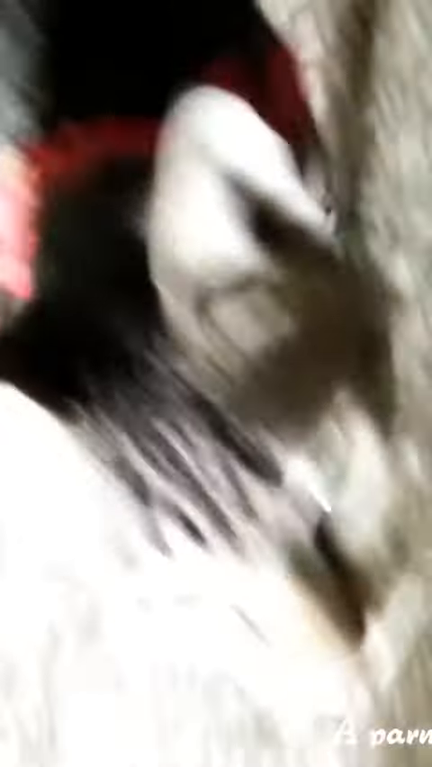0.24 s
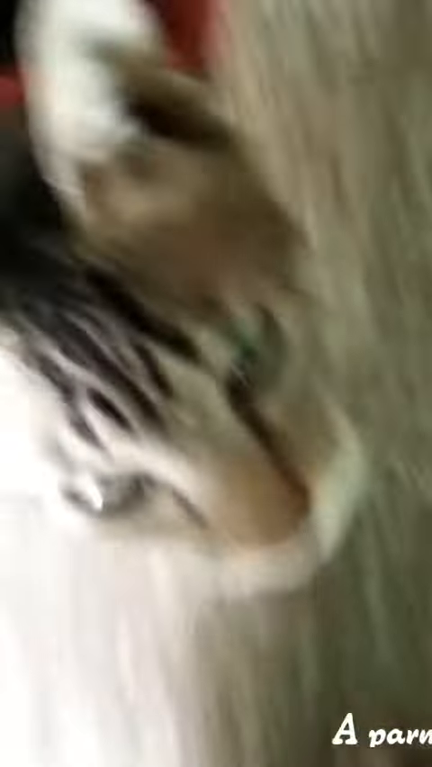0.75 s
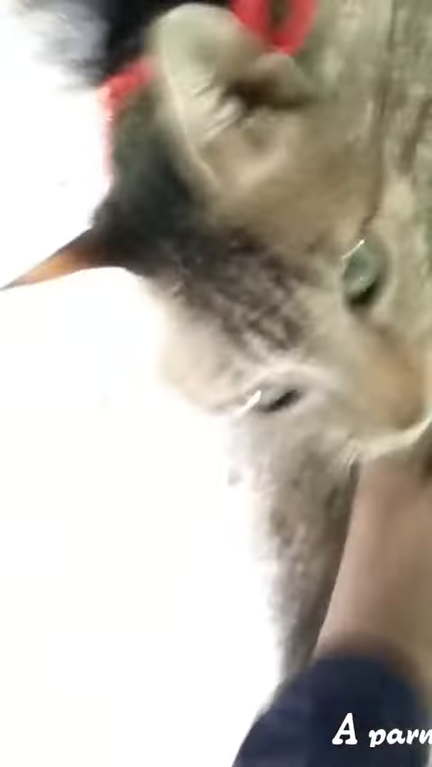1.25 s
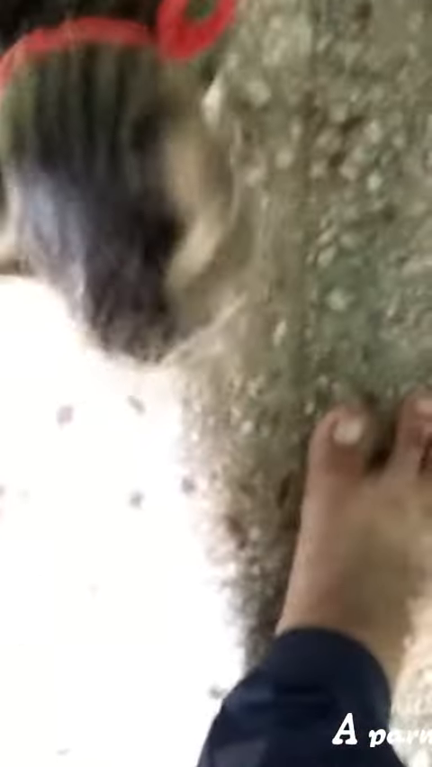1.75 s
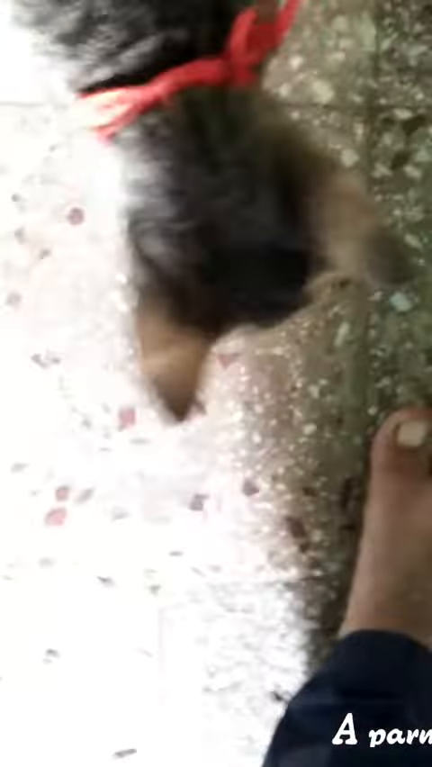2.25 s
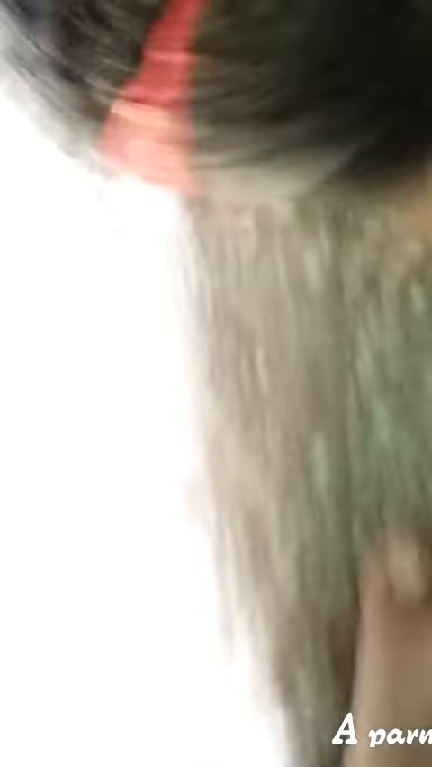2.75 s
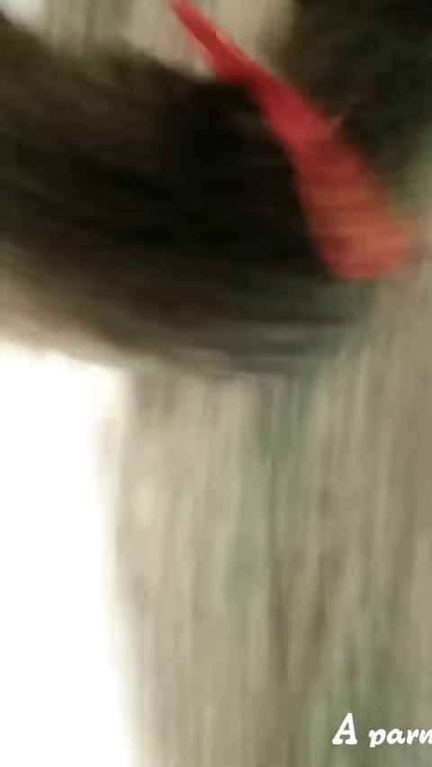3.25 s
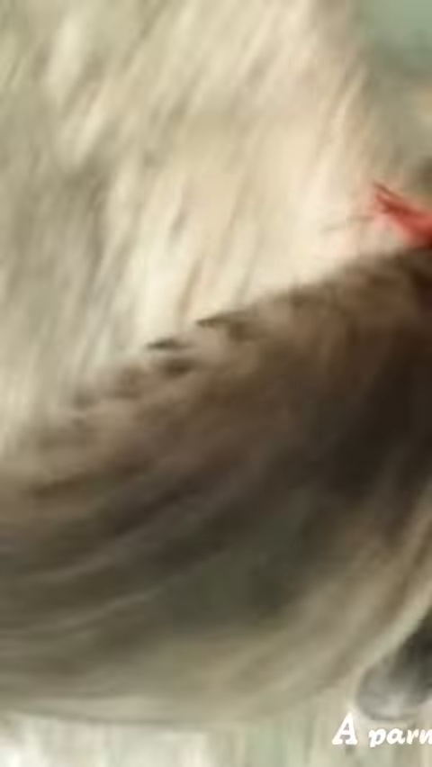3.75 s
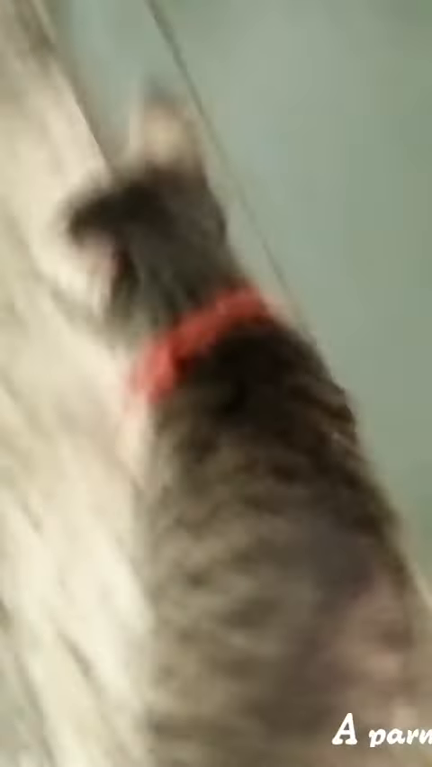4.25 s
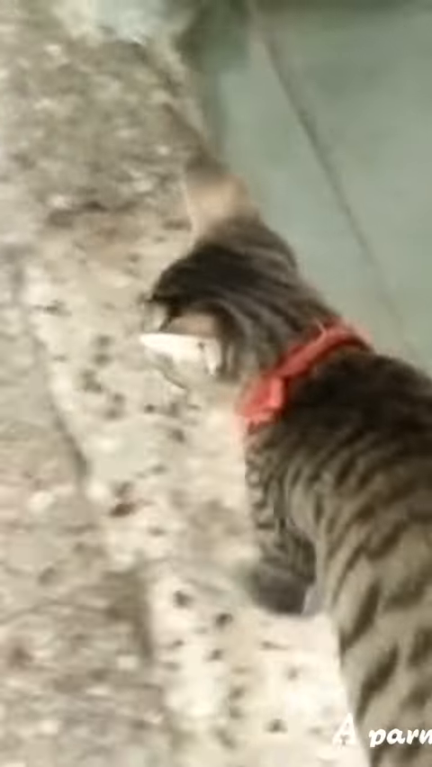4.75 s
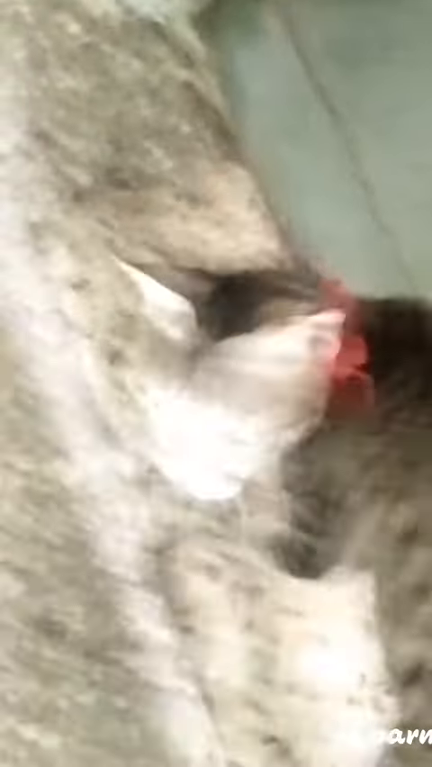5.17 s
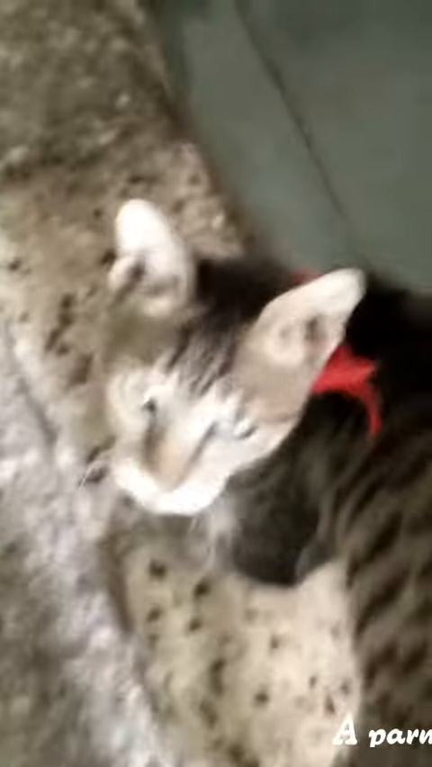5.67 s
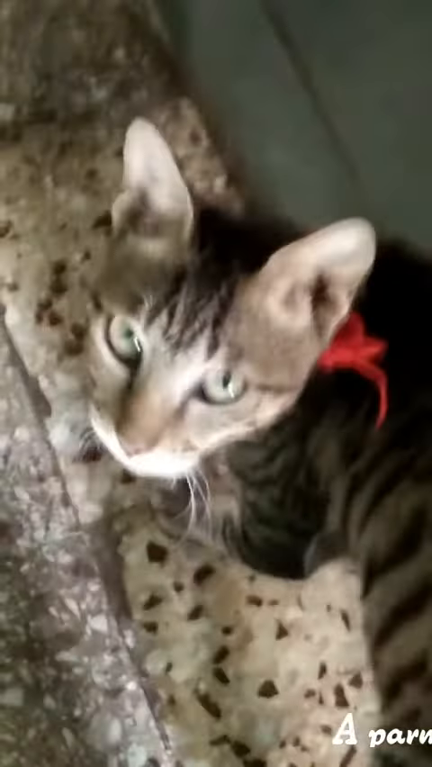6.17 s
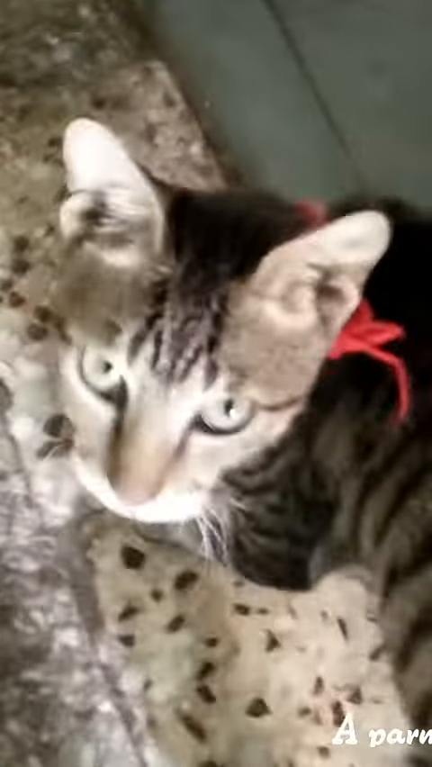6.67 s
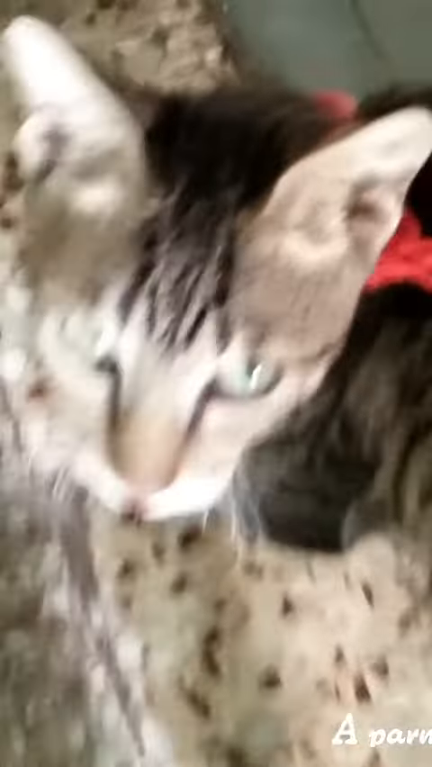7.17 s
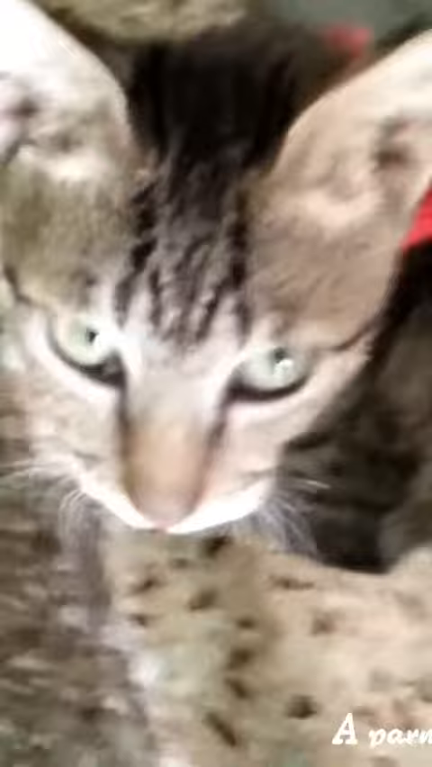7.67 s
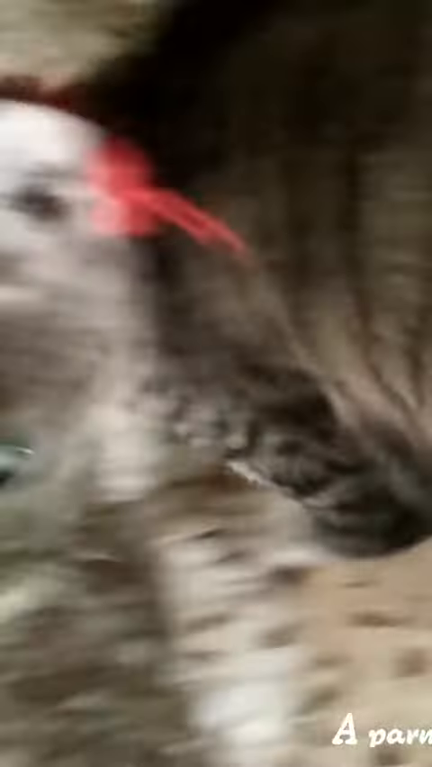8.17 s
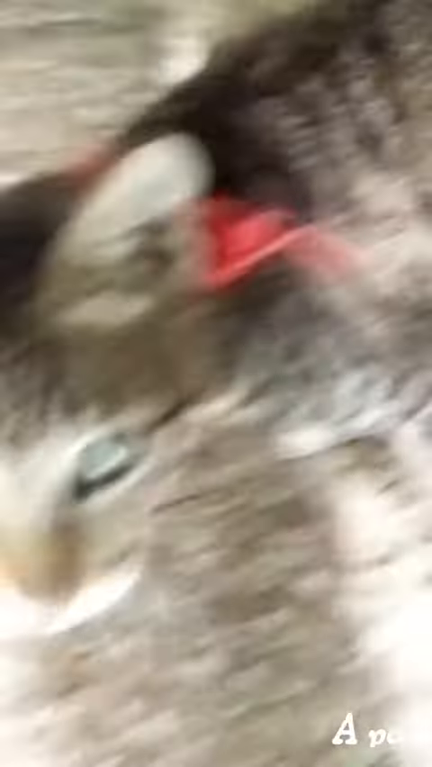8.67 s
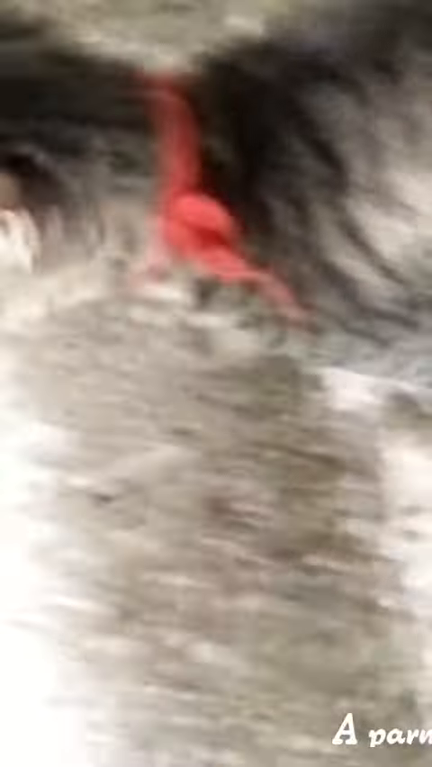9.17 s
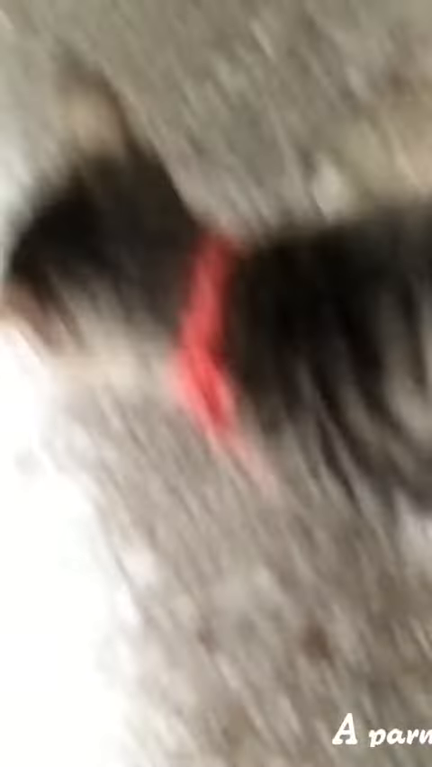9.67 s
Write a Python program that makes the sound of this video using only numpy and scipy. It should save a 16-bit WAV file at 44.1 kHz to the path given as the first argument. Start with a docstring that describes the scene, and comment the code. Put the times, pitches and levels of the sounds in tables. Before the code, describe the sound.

Irregular low thumps, clicks and brief rubbing from a phone being jostled in the hand, over faint rumble and hiss.

```python
"""Close above a kitten, on a carried phone: only the handling is heard. Jostling pushes air in and
out of the microphone port in sudden steps, and the phone's low cut turns each into a falling thump.
The case clicks and is rubbed, and swaying air rumbles underneath. The hiss follows the level,
and the quietest sound crackles on coarse amplitude steps."""
import sys
import numpy as np
from scipy import signal
from scipy.io import wavfile
from scipy.ndimage import uniform_filter1d

SR = 44100
rng = np.random.default_rng(int(sys.argv[2]) if len(sys.argv) > 2 else 0)


def master(y):
    """Save y as 16-bit WAV."""
    cut = np.clip(np.atleast_2d(y).T, -1, 1)
    pcm = np.round(cut * 32767)  # scale
    wavfile.write(sys.argv[1], SR, pcm.astype(np.int16))


N = 437913

# The thumps, as pressure steps at the port: start_s, level_db, direction (+1 or -1), rise_ms
PRESSURE_STEPS = [(0.0122, -13, 1, 1.7), (0.0202, -12.5, 1, 0.28), (0.0508, -8.5, -1, 0.2),
                  (0.0723, -6.5, 1, 3.4), (0.0822, -9.5, 1, 0.35), (0.089, -13, -1, 0.47),
                  (0.102, -25.5, 1, 0.24), (0.1573, -8.5, 1, 5.6), (0.1666, -15, 1, 0.27),
                  (0.1724, -13.5, -1, 0.17), (0.2705, -22.5, 1, 0.32), (0.3421, -26.5, -1, 0.4),
                  (0.4066, -18, 1, 0.4), (0.5455, -24, 1, 1.64), (0.598, -19, -1, 1.45),
                  (0.6999, -17, -1, 0.2), (0.8137, -22, -1, 0.48), (0.8271, -25, -1, 0.51),
                  (0.8912, -24.5, -1, 0.45), (0.9242, -6.5, 1, 1.53), (0.9461, -14, -1, 0.48),
                  (1.0042, -24.5, 1, 0.68), (1.097, -13, 1, 0.36), (1.1312, -17.5, 1, 1.84),
                  (1.1768, -28, -1, 0.36), (1.2776, -6, -1, 1.73), (1.3344, -18.5, 1, 0.26),
                  (1.352, -7, -1, 1.44), (1.3617, -10, -1, 0.4), (1.4545, -19, 1, 0.3),
                  (1.5261, -10.5, 1, 0.26), (1.539, -11.5, 1, 0.33), (1.559, -14, -1, 0.5),
                  (1.666, -4, -1, 0.18), (1.6772, -8, -1, 2.4), (1.7307, -22.5, -1, 0.05),
                  (1.9443, -3.5, 1, 0.12), (1.9841, -33.5, 1, 0.17), (2.0311, -19, 1, 0.31),
                  (2.1078, -23.5, 1, 1.64), (2.3471, -25, -1, 1.65), (2.4903, -33.5, -1, 0.46),
                  (2.5856, -8.5, 1, 0.24), (2.7108, -16.5, -1, 1.4), (2.7446, -12, -1, 0.58),
                  (2.7584, -4, -1, 0.19), (2.7764, -15, -1, 0.72), (2.7801, -8.5, -1, 0.76),
                  (2.7926, -10, -1, 0.28), (2.831, -9, -1, 0.25), (2.9144, -8, 1, 0.2),
                  (2.9706, -11.5, 1, 0.23), (3.1494, -26, -1, 0.12), (3.193, -28.5, 1, 0.57),
                  (3.2816, -8.5, -1, 0.24), (3.2859, -5, -1, 0.44), (3.291, -16.5, -1, 0.25),
                  (3.3276, -24.5, -1, 0.26), (3.3777, -9.5, -1, 0.21), (3.5155, -9.5, -1, 0.27),
                  (3.5215, -18, -1, 0.32), (3.6081, -17.5, 1, 0.66), (3.666, -23.5, 1, 0.48),
                  (3.6848, -5.5, -1, 0.2), (3.698, -3.5, 1, 2.35), (3.718, -11.5, -1, 0.33),
                  (3.7312, -8.5, -1, 0.44), (3.7501, -7.5, -1, 0.33), (3.7974, -8, -1, 0.24),
                  (3.8123, -9, -1, 0.38), (3.8324, -14.5, -1, 1.1), (3.8447, -30, -1, 0.19),
                  (3.9175, -12.5, -1, 0.16), (3.9335, -22.5, 1, 0.43), (4.0115, -36, 1, 0.096),
                  (4.097, -13.5, 1, 1.86), (4.155, 5.5, -1, 2.67), (4.1694, -0.2, -1, 0.12),
                  (4.2289, -3.5, -1, 0.16), (4.2619, -16.5, -1, 0.25), (4.372, -25, 1, 0.28),
                  (4.535, -22.5, -1, 1.86), (4.5938, -22.5, 1, 1.76), (4.795, -20.5, -1, 0.44),
                  (4.8637, -24, 1, 0.68), (4.8955, -22.5, -1, 0.45), (5.0776, -18.5, -1, 0.9),
                  (5.1192, -25, -1, 0.61), (5.187, -23.5, -1, 0.6), (5.299, -23.5, -1, 0.54),
                  (5.348, -13.5, -1, 0.97), (5.377, -22.5, 1, 0.7), (5.4207, -20, 1, 0.44),
                  (5.488, -21, 1, 0.91), (5.5663, -20.5, -1, 1.7), (5.6052, -14, -1, 0.42),
                  (5.6315, -10.5, -1, 0.35), (5.732, -18, 1, 2.1), (5.8475, -5.5, -1, 0.93),
                  (5.964, -0.5, -1, 0.11), (5.9698, 3, 1, 1.67), (5.9771, -11, -1, 0.28),
                  (6.1202, -12.5, -1, 0.44), (6.1362, 2.3, -1, 0.13), (6.1403, -10.5, -1, 0.41),
                  (6.3821, -8, -1, 0.72), (6.4117, -2.5, -1, 0.12), (6.4211, -4.5, -1, 0.62),
                  (6.4341, -13, -1, 0.26), (6.574, -1, -1, 0.17), (6.5955, -23.5, 1, 0.6),
                  (6.6188, -9, -1, 0.6), (6.6236, -8, 1, 1.2), (6.632, -16, -1, 0.14),
                  (6.6454, -1.5, -1, 5.7), (6.685, -8, -1, 0.16), (6.6922, -9.5, -1, 0.41),
                  (6.7027, -10, -1, 0.24), (6.7072, -20, -1, 0.35), (6.7271, -16.5, 1, 0.67),
                  (6.765, -4, 1, 0.87), (6.7842, -15.5, -1, 0.22), (6.8035, -11.5, -1, 0.19),
                  (6.8084, -14, -1, 0.23), (6.819, -15.5, -1, 0.31), (6.954, -17.5, 1, 2.03),
                  (6.994, -22.5, 1, 0.11), (7.1352, -14.5, -1, 2.1), (7.2333, -10, -1, 0.2),
                  (7.2635, -19.5, -1, 1.33), (7.325, -23, -1, 0.41), (7.4067, -31, 1, 0.49),
                  (7.4949, -21, 1, 0.48), (7.6601, -14, -1, 0.31), (7.7373, -29.5, 1, 0.49),
                  (7.8274, -18.5, 1, 1.67), (7.9857, -19, -1, 0.83), (8.0287, -20, -1, 2.16),
                  (8.2706, -27.5, -1, 1.36), (8.6902, -9.5, -1, 2.05), (8.7892, -21.5, -1, 1.2),
                  (8.8018, -10.5, 1, 2.04), (8.8118, -16.2, -1, 2.25)]


def jolts():
    """Each jolt is a short puff of air that adds up to a smooth step of pressure."""
    flow, offsets = np.zeros(N + 2000), np.arange(-1000, 1000)
    for start_s, level_db, direction, rise_ms in PRESSURE_STEPS:
        at = round(start_s * SR)
        width = 2 * max(rise_ms, .02) * SR / 1000
        from_centre = (offsets + at - start_s * SR) / width
        puff = 1 / np.cosh(np.clip(from_centre, -30, 30)) ** 2
        flow[at:at + 2000] += np.sign(direction) * gain_of(level_db) * puff / puff.sum()
    return np.cumsum(flow[1000:N + 1000])


# The click's tone, strongest in the mids: frequency_hz, gain_db
CLICK_EQ = [(100, -13), (400, 0.5), (1000, 2), (2000, -4), (4000, -11.5), (8000, -20), (11000, -22.5),
            (14500, -38.5)]
# Hard clicks on the front of sharp jolts: start_s, strength_db
CASE_CLICKS = [(0.172, -51), (.592, -55), (1.6656, -25), (1.7326, -43), (1.9435, -21.5), (2.5837, -37.5),
               (2.758, -40), (3.5152, -47), (3.9166, -42), (4.167, -47), (4.2286, -37.5), (4.371, -42.5),
               (5.42, -41), (5.8467, -50), (5.9635, -11), (6.1361, -21.5), (6.381, -40), (6.4112, -43),
               (6.5736, -19), (6.994, -35)]


def case_clicks():
    """The case flexes: a click against the nearest jolt's direction, then a smaller rebound."""
    dull_hz, bright_hz, brighten_above_db, db_per_octave = 2500, 12000, -30, 5
    out, click = np.zeros(N + 1024), impulse_of(CLICK_EQ)
    click = click / abs(click).max()
    jolt_s, _, directions, _ = np.transpose(PRESSURE_STEPS)
    for (start_s, strength_db), lag in zip(CASE_CLICKS, rng.random(len(CASE_CLICKS))):
        rebound = -0.27 * np.roll(click, 6 + round(14 * lag))
        octaves_up = (strength_db - brighten_above_db) / db_per_octave  # harder is brighter
        cutoff_hz = np.clip(dull_hz * 2 ** octaves_up, dull_hz, bright_hz)
        snap = signal.lfilter(*signal.butter(2, cutoff_hz, fs=SR), click + rebound)
        direction = np.sign(directions[abs(jolt_s - start_s).argmin()])
        out[round(start_s * SR):][:1024] -= direction * gain_of(strength_db) * snap
    return out[:N]


def nudges():
    """Soft random pressure steps either way, thicker and stronger as the hand grows restless."""
    nudges_per_s, rise_ms, calm_db, restless_db = 14, 1.9, -49, -40
    activity = np.clip((unrest_db() - calm_db) / (restless_db - calm_db), 0, 2)
    fires = rng.random(N) < activity * nudges_per_s / SR
    direction = rng.choice([-1., 1.], N)
    strength = activity * gain_of(-21 + 3 * rng.standard_normal(N))
    puff = 1 / np.cosh(np.arange(-1000, 1001) / (2 * rise_ms * SR / 1000)) ** 2
    flow = signal.oaconvolve(fires * direction * strength, puff / puff.sum(), "same")
    return np.cumsum(flow)


# Short scuffs against the case: start_s, end_s, level_db
CASE_RUBS = [(0.036, 0.121, -45), (1.244, 1.414, -53.5), (2.739, 2.86, -46.5), (3.677, 3.856, -50.5),
             (5.312, 5.401, -44), (6.68, 6.847, -42.5), (7.053, 7.152, -55.5)]


def case_rubs():
    """Rubbing is many tiny uneven slips, each a small rounded step of pressure."""
    slips_per_s, cutoff_hz = 970, 640
    envelope = sum(gain_of(db) * swell(start_s, end_s) for start_s, end_s, db in CASE_RUBS)
    slips = rng.standard_normal(N) * (rng.random(N) < slips_per_s / SR)
    rounded = signal.sosfilt(signal.butter(2, cutoff_hz, fs=SR, output="sos"), slips)
    pressure = signal.lfilter([1], [1, -.99], rounded)  # each step leaks away
    return envelope * unit_rms(pressure)


# The hand's restlessness, as a fader ride on the swaying air: time_s, level_db
HAND_UNREST = [(0.0, -39.5), (0.25, -52.5), (0.75, -52.5), (0.95, -40), (1.5, -43), (1.75, -52.5),
               (2.5, -53), (2.9, -43.5), (3.4, -48.5), (4.2, -39), (4.7, -52), (5.2, -41.5), (5.9, -40),
               (6.3, -51.5), (6.8, -46), (7.2, -39), (7.95, -44), (8.15, -51), (9.25, -52), (9.33, -41.5),
               (9.45, -52), (9.93, -50)]


def unrest_db():
    """How much the hand stirs the air; each rub lifts it by up to 8 dB."""
    rubbing = sum(swell(start_s, end_s) for start_s, end_s, _ in CASE_RUBS)
    return np.interp(np.arange(N) / SR, *np.transpose(HAND_UNREST)) + 8 * rubbing


def air_sway():
    """Air moving past the port makes a lumpy low rumble."""
    rumble_hz, lumps_hz, lumps_db = 50.6, 14, 3.0
    rumble = signal.sosfilt(signal.butter(3, rumble_hz, fs=SR, output="sos"), rng.standard_normal(N))
    lumps = signal.sosfiltfilt(signal.butter(2, lumps_hz, fs=SR, output="sos"), rng.standard_normal(N))
    return unit_rms(rumble) * gain_of(unrest_db() + lumps_db * unit_rms(lumps))


# The noise bed's tone, heavy in the lows: frequency_hz, gain_db
HISS_EQ = [(100, 12), (300, 8.5), (700, -1), (1500, -1.5), (3000, -3), (6000, -5), (10000, -13),
           (14500, -13.5)]
# Thin whistles, with levels relative to the noise bed: start_s, end_s, pitch_hz, level_db
FAINT_TONES = [(2.894, 3.004, 2130, -5), (2.95, 3.316, 1413, -12)]


def hiss():
    """Noise of room and electronics, with faint tones tucked into it."""
    bed = unit_rms(signal.oaconvolve(rng.standard_normal(N), impulse_of(HISS_EQ))[:N])
    t = np.arange(N) / SR
    for start_s, end_s, pitch_hz, level_db in FAINT_TONES:
        fade = np.clip(np.minimum(t - start_s, end_s - t) / .02, 0, 1)
        bed += gain_of(level_db) * fade * np.sin(2 * np.pi * pitch_hz * t)
    return bed


def gain_of(db):
    """Decibels to gain."""
    return 10 ** (np.asarray(db) / 20)


def unit_rms(x):
    """Scales to rms 1."""
    return x / np.sqrt(np.mean(x ** 2) + 1e-20)


def swell(start_s, end_s):
    """A half-sine fade up and down."""
    return np.sin(np.pi * np.clip((np.arange(N) / SR - start_s) / (end_s - start_s), 0, 1))


def impulse_of(eq):
    """Causal impulse response of an EQ curve."""
    points_hz, gain_db = np.transpose(eq)
    hz = abs(np.fft.fftfreq(4096, 1 / SR))
    log_gain = np.interp(np.log(hz + 1), np.log(points_hz), gain_db) * np.log(10) / 20
    return np.fft.ifft(np.exp(np.conj(signal.hilbert(log_gain)))).real[:1024]


def follow_level_db(x):
    """Envelope follower: fast attack, steady release, lightly smoothed."""
    release_db_per_s = 1198
    power_db = 10 * np.log10(abs(uniform_filter1d(x ** 2, round(0.0023 * SR))) + 1e-11)
    fall_db = np.arange(N) * release_db_per_s / SR
    held_db = np.maximum.accumulate(power_db + fall_db) - fall_db
    return uniform_filter1d(held_db, round(0.0042 * SR))


def scene():
    """All that presses on the microphone, in mono."""
    return (jolts() + nudges() + case_clicks() + case_rubs() + air_sway())[None]


# Resonant high-pass stages that turn steps into thumps: cutoff_hz, q
LOW_CUT_STAGES = [(56.5, 1.59), (35.4, 2.4), (122, .79)]


def record(dry):
    """The phone's chain: low cut, narrow ring, expander, hiss, coarse steps and treble roll-off."""
    dip_hz, ring_hz, ring_q = 3925, 4060, 28
    knee_db, expansion = -32, .4
    hiss_full_scale_db, hiss_db_per_db = -48.5, 0.63
    amplitude_step, top_hz, floor_db = 10 / 2 ** 15, 14400, -100
    x = dry[0]
    for cutoff_hz, q in LOW_CUT_STAGES:
        w = 2 * np.pi * cutoff_hz
        x = signal.lfilter(*signal.bilinear([1, 0, 0], [1, w / q, w * w], SR), x)
    # a dip just under a peak: sharp clicks ring briefly
    dip, ring = signal.iirnotch(dip_hz, ring_q, SR)[1], signal.iirnotch(ring_hz, ring_q, SR)[1]
    x = signal.lfilter(dip / dip.sum(), ring / ring.sum(), x)
    level_db = follow_level_db(x)
    x = x * gain_of(-expansion * np.maximum(knee_db - level_db, 0))  # tightens the tails
    x = x + hiss() * gain_of(hiss_full_scale_db + hiss_db_per_db * level_db)
    x = amplitude_step * np.floor(x / amplitude_step)  # quiet sound sticks, then flips: crackle
    x = signal.lfilter(*signal.butter(1, top_hz, fs=SR), x)
    x = x + gain_of(floor_db) * rng.standard_normal(N)
    band_limit = signal.firwin(511, top_hz, window=("kaiser", 9), fs=SR)
    return signal.oaconvolve(x, band_limit, "same")[None]


dry = scene()
out = record(dry)
master(out)
```